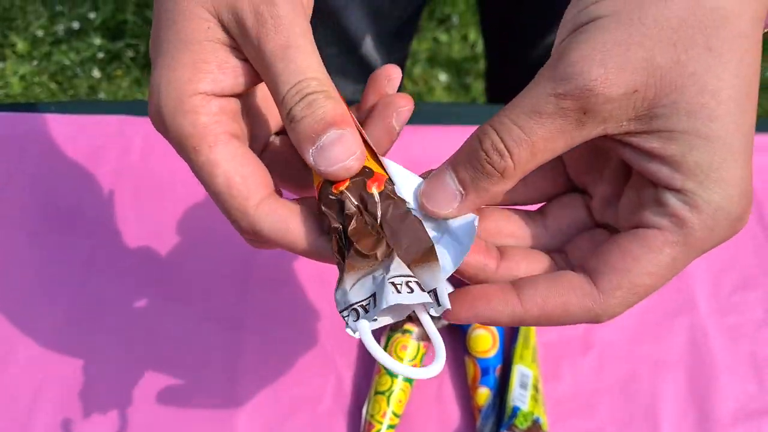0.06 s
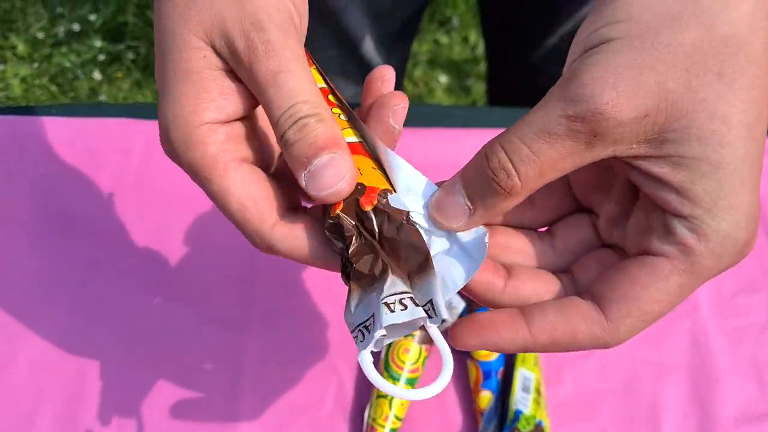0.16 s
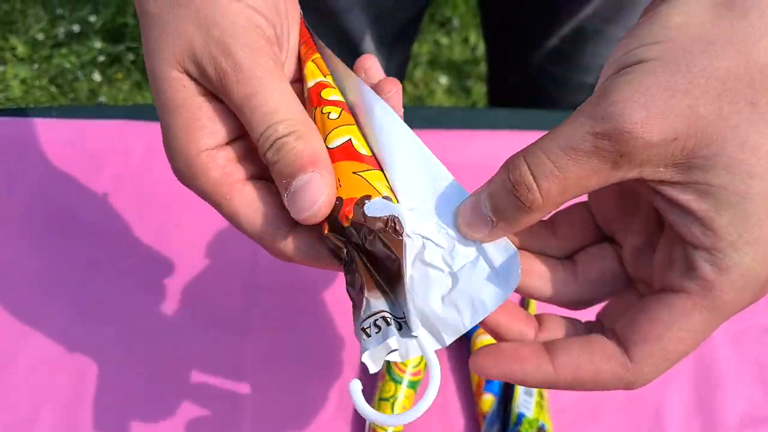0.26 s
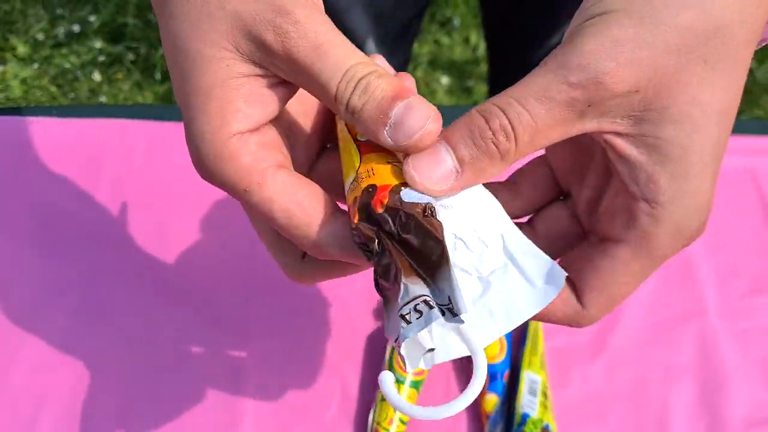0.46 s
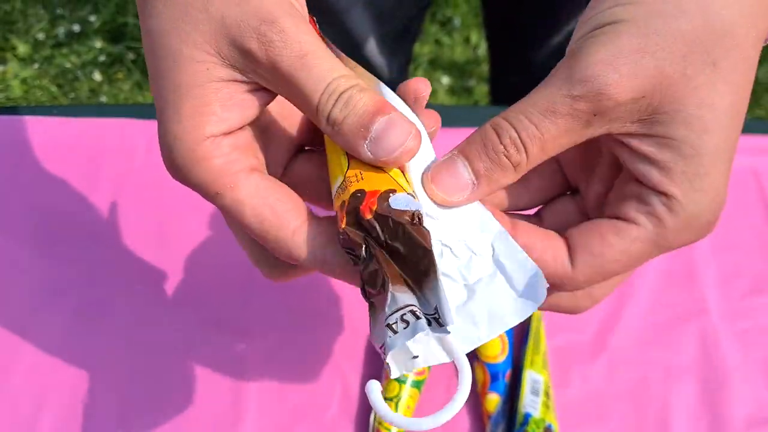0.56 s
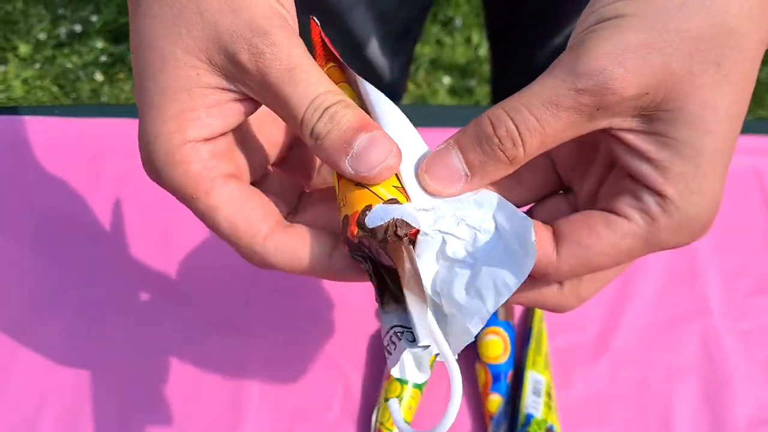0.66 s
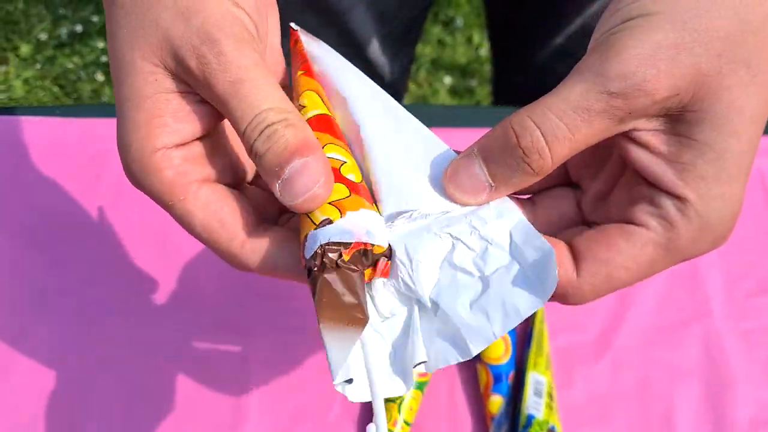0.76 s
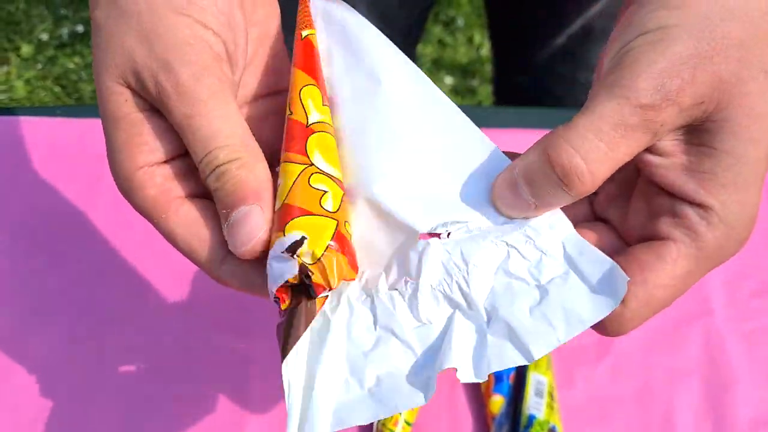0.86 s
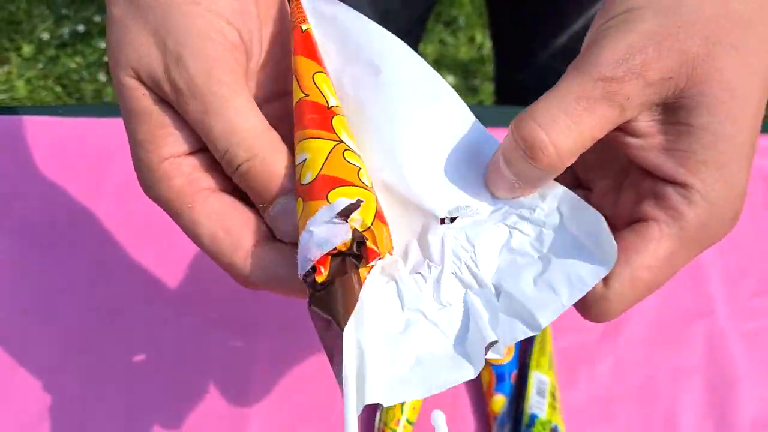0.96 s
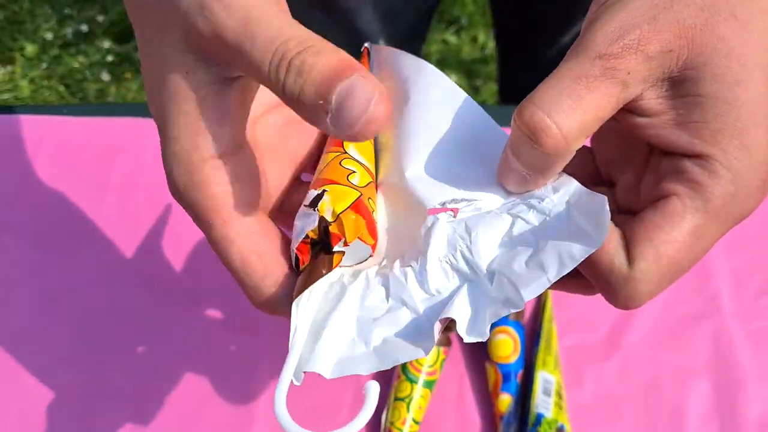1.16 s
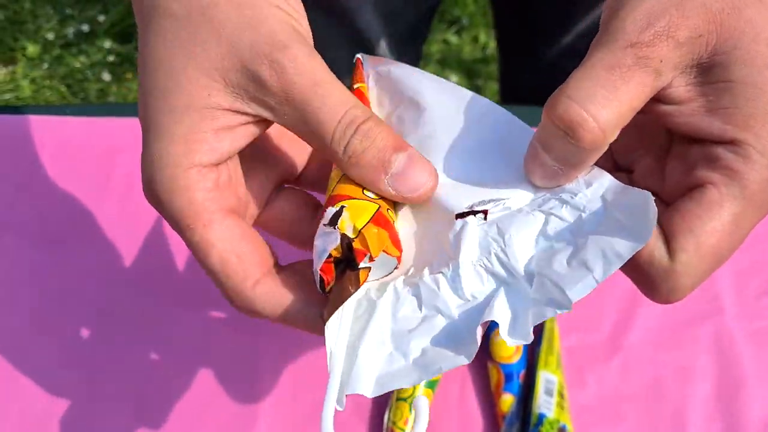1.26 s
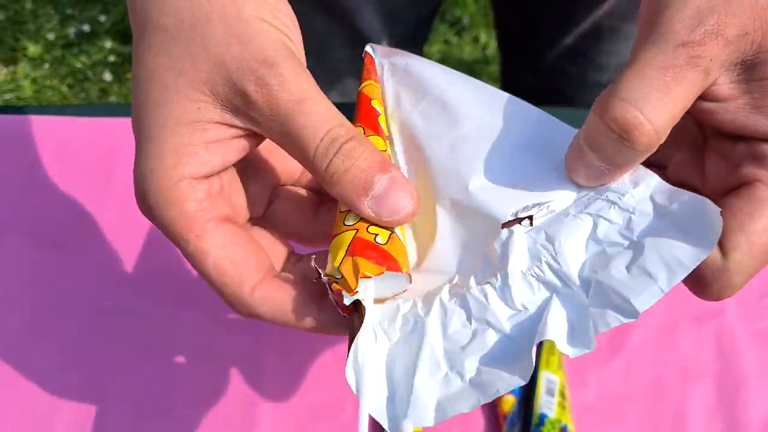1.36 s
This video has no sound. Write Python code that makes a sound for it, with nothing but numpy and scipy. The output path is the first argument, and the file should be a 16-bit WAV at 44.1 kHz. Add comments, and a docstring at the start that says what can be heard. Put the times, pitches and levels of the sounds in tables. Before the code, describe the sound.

Hands peel a paper and foil sweet wrapper: scattered sharp snaps, a short rip, then a louder tearing burst and dying dry rustle; faint birds and light breeze, outdoors, close stereo phone microphone.

```python
"""Sharp paper snaps, two swells of ripping and a dry rustle, with faint bird whistles and a low breeze behind.
Hands peel a paper and foil wrapper off a sweet, close to a phone held outdoors.
Snaps are short bursts of noise and the rip is a dense rain of tiny cracks; both ring the same paper resonances.
Birds are wavering sine tones with echoes, the breeze is filtered noise, and air puffs are brief low swings."""
import sys
import numpy as np
from scipy import signal
from scipy.fft import rfft, irfft
from scipy.io import wavfile
from scipy.ndimage import uniform_filter1d

SR = 44100
rng = np.random.default_rng(int(sys.argv[2]) if len(sys.argv) > 2 else 0)


def master(y):
    """Save y as 16-bit WAV."""
    cut = np.clip(np.atleast_2d(y).T, -1, 1)
    pcm = np.round(cut * 32767)  # scale
    wavfile.write(sys.argv[1], SR, pcm.astype(np.int16))


N = 61739

# Breeze on the microphones. Each row: time in seconds, level in dB.
WIND = [(0.0, -42), (0.076, -50.5), (0.224, -52.5), (0.334, -63), (0.49, -39), (0.528, -56), (0.7, -48),
        (0.72, -46), (0.848, -55), (0.906, -48.5), (0.992, -59), (1.104, -46.5), (1.176, -62), (1.222, -53),
        (1.256, -39), (1.4, -45.5)]
# Tone of the breeze. Each row: frequency in Hz, relative strength in dB per Hz.
WIND_TONE = [(12, -47), (20, -3), (70, 17), (88, 3), (118, -2), (172, -19), (271, -16), (300, -9),
             (390, -24), (660, -120)]
# Tone of the garden hush. Each row: frequency in Hz, relative strength in dB per Hz.
HUSH_TONE = [(88, -42), (150, -22), (923, -33), (3100, -28), (3490, -22), (5150, -35.5), (6390, -33),
             (14500, -53), (16000, -61)]
# Puffs of air. Each row: start in seconds, level in dB, pitch in Hz, left level minus right level in dB.
BUFFETS = [(0, -31, 70, 21), (0.718, -30.5, 59.6, -9), (1.258, -31, 77, -17)]
# Bird calls, one list per call. Each row: time in seconds, pitch in Hz, level in dB.
BIRDS = [
    [(.544, 4300, -48), (.553, 4900, -44), (.565, 4650, -46), (.578, 3600, -48)],
    [(.583, 3500, -46), (.591, 4350, -47), (.603, 3550, -48)],
    [(.606, 3150, -50), (.621, 2700, -53)],
    [(.965, 3130, -61), (.99, 3300, -59), (1.025, 3350, -62)],
    [(1.065, 3550, -60), (1.1, 3730, -58), (1.12, 3700, -60)],
    [(1.295, 3700, -55), (1.345, 3650, -53), (1.37, 3600, -57)],
]
# Resonances of the wrapper. Each row: pitch in Hz, width in Hz, level in dB.
SHEET = [(359, 590, -9), (613, 209, 7), (1100, 130, 10), (1440, 216, 13), (1836, 332, 11),
         (2277, 270, 10.5), (3058, 885, 11.5), (4000, 620, 11.5), (4650, 670, 4), (5700, 1730, -1),
         (7480, 1150, -1.5), (9870, 2230, -10.5), (12600, 2230, -5.5), (14340, 7200, -14)]
# The lowest resonance grows as the flap unfolds. Each row: time in seconds, added level in dB.
FLAP = [(.6, -16), (.9, 16.5)]
# Ripping and rustling. Each row: time in seconds, level in dB, then bass, low middle and treble in dB
# against the middle.
RIP = [(0, -78.5, 0, -2, 21.5), (.09, -52.5, -26, -4, 5), (.15, -40.5, -16, -10.5, -2),
       (.19, -26.5, -16, -8, -1.5), (.245, -26, -14.5, -1.5, -8), (.27, -49, -12, -5.5, -5.5),
       (.31, -55, -3, -2.5, -5), (.345, -44.5, -11, 0.5, -3), (.38, -57, -6, -14, -4),
       (.41, -80, -6, -3, -28), (.46, -60, -4, 1, 4), (.51, -35.5, -20.5, -6.5, -19),
       (.57, -44, -13, 4, -10.5), (.585, -50.5, -10, -13, -64), (.635, -43.5, -23, -20, -3),
       (.645, -30.5, -18, -5, -3), (.668, -36, -7.5, -5.5, 0), (.682, -21, -15, -11.5, -7),
       (.73, -22.5, -10.5, -1.5, -2), (.765, -18, -3.5, -2, -4.5), (.787, -19.5, -8.5, -15, -8.5),
       (.795, -45, -11, -27, -8.5), (.83, -29.5, -6.5, 1, 3), (.845, -48, -4, -3, -4.5),
       (.93, -42, -10, -2, -6.5), (.96, -49.5, -3, -1, 1.5), (1.02, -56, -4.5, -7.5, -4.5),
       (1.07, -43.5, -5, -2, 3.5), (1.1, -55, -12, -11, 1), (1.14, -56, -4.5, -6.5, -0.5),
       (1.25, -65, -3, 11.5, 13.5), (1.3, -52, -9, -10.5, 2.5), (1.37, -48.5, -16, -12, -8.5),
       (1.4, -37, -7.5, -2, -8)]
# Snapping creases. Each row: start in seconds, level in dB, favoured pitch in Hz, then bass, low middle,
# middle and treble in dB added to that level, and time for the crack to build up in milliseconds.
SNAPS = [(0.039, -32, 7950, -34, -29, -21.5, -10.5, 0.75), (0.0828, -17, 4300, -40, -38, -6.5, -15, 0.585),
         (0.195, -24.5, 3180, -24, -5.5, -28, -4.5, 0.96), (0.227, -22.5, 645, -3, -32, -14, -24, 0.17),
         (0.3242, -9.5, 3850, -29, -13.5, -11.5, -14, 0.93), (0.346, -33, 1490, -21, -8, -20, -26, 0.89),
         (0.386, -28.5, 4000, -33, -29, -12, -15, 0.81), (0.433, -41, 1330, -20, -13, -9, -14, 1),
         (0.462, -29.5, 1740, -25, -14, -11.5, -9.5, 0.45), (0.505, -34, 1100, -32, -2.5, -7, -12.5, 0.32),
         (0.5291, -4, 3800, -31.5, -17, -10.5, -16, 0.591), (0.543, -35, 1500, -17, -27, -15, -29, 0.58),
         (0.553, -42, 1410, -28, 0, -11, -13, 0.92), (0.5655, -26.5, 540, -12, -8.5, -5, -36, 0.93),
         (0.6405, -35, 2060, -27, 7, 11, -5, 0.83), (0.644, -15.5, 2840, -22.5, -28.5, -12, -16, 0.72),
         (0.6539, -38.5, 3940, -31, -18, 6.5, 13, 0.67), (0.755, -6, 600, -15, -12, -9.5, -15, 0.77),
         (0.768, -13.5, 706, -29, -7.5, -9, -8, 0.92), (0.781, -4.5, 2880, -41, -13.5, -7.5, -17, 0.79),
         (0.795, -13, 1100, -12.5, -9, -12.5, -22, 1), (0.812, -14.5, 1110, -13, -14, -18, -15, 0.76),
         (0.822, -12, 470, -16.5, -14, -16, -13, 0.88), (0.828, -22, 1100, -13.5, -24, -1, -15, 1),
         (0.845, -22, 1210, -15.5, -4, -16, -31, 0.66), (0.878, -24.5, 1230, -25, -11.5, -11, -24.5, 0.9),
         (0.888, -34, 1450, -13, -9, -9, -6, 0.85), (0.908, -26, 4500, -17, -32, -9.5, -17, 0.8),
         (0.922, -24, 3870, -17.5, -14.5, -11, -9.5, 0.87),
         (0.932, -18, 377, -13.5, -16, -11, -12.5, 0.828), (0.976, -34.5, 520, -8, -14, -19, -14.5, 1),
         (1.029, -43, 513, 0.5, -8, -10, -26, 1), (1.2303, -45, 7200, -18, -28, -11, -8, 1),
         (1.2092, -25, 2230, -20, -23, -9.5, -12, 0.98), (1.2386, -30.5, 1100, -30, -9, -7, -26, 0.85),
         (1.254, -23, 553, -8, -16.5, -13.5, -14, 0.74), (1.296, -35.5, 1420, -13, -6.5, -7.5, -25, 0.89),
         (1.315, -26, 4250, -19, -21, -9, -20, 0.9), (1.379, -18, 1600, -20.5, -12.5, -16, -24, 0.91),
         (1.3874, -16, 3820, -27, -23, -10.5, -8, 0.74)]

WIND_SIDE_DB = -1.5  # the part of the breeze that is opposite on the two sides
HUSH_DB, HUSH_FLICKER_DB = -56.5, 0.5
BUFFET_S = 0.0062  # time for a puff to reach its full swing
BIRD_ROUGH, BIRD_WOBBLE = .5, .018  # wander of loudness and of pitch, as shares
BIRD_EDGE_S, BIRD_ECHO_DB, BIRD_ECHO_S = 0.00069, 1, .03
SPLITS_HZ = (900, 2000, 5200)  # borders between bass, low middle, middle and treble
LAG_S, SNAP_LAG_S, LAG_SPREAD_S = .0001, .00007, .00002  # the left port hears the sheet first
RIGHT_DB = 2.5  # the low middle is stronger on the right
APART_HZ = 3260  # sets how fast the two ports drift out of step as pitch rises
SCATTER_DB, SCATTER_PITCH = 0.6, 0.019  # how much resonances differ from spot to spot: level, share of pitch
CRACKS_PER_S, CRACK_SPREAD_DB, RIP_FLUTTER_DB = 13000, 1.8, 1.4
RIP_FLAP_DB = -9.0  # added to the lowest resonance in the rip
SHIVER_DB, SHIVER_S = -13, .005  # the sheet shivers on after each snap
BREAK_DB, BREAK_S = 17, .000033  # the single sharp break at the height of a crack
PITCH_DB, PITCH_SHARE = 5, .2  # the favoured ring: strength of the added peak, width / pitch
SNAP_SPAN_S = .006  # band levels are means over this span
SNAP_DAMP = 1.5  # fingers on the crease widen the resonances
TOP_HZ = 15800  # top of the recorded range


def undb(db):
    """Turn dB into a plain multiplier."""
    return 10 ** (np.asarray(db) / 20)


def unit(x):
    """Scale a signal to an average (rms) strength of 1."""
    return x / np.sqrt(np.mean(x ** 2))


def curve(rows, col):
    """One column of a table as a value per sample, joined by straight lines."""
    rows = np.array(rows)
    return np.interp(np.arange(N) / SR, rows[:, 0], rows[:, col])


def walk(rate):
    """Smooth random wander, spread 1, with about `rate` new values a second."""
    k = int(SR / rate)
    steps = np.repeat(rng.standard_normal(N // k + 1), k)
    return unit(uniform_filter1d(steps, k)[:N])


def coloured(shape):
    """Noise of rms 1 whose spectrum follows a table of (Hz, dB) points."""
    f = np.arange(N // 2 + 1) * SR / N + 1  # the 1 keeps the logarithm finite
    shape = np.array(shape)
    gain = undb(np.interp(np.log(f), np.log(shape[:, 0]), shape[:, 1], left=-80))
    return unit(irfft(rfft(rng.standard_normal(N)) * gain, N))


def outdoors():
    """Gusty rumble, largely different on each port, over a faint, slightly flickering hush."""
    mid = coloured(WIND_TONE)
    side = coloured(WIND_TONE) * undb(WIND_SIDE_DB)
    wind = undb(curve(WIND, 1)) * np.array([mid + side, mid - side])
    hush = np.array([coloured(HUSH_TONE), coloured(HUSH_TONE)])
    return wind + undb(HUSH_DB + HUSH_FLICKER_DB * walk(15.0)) * hush


def buffets():
    """A puff of air rocks the microphone membranes for a cycle or two: a sine that swells and dies away."""
    out, t = np.zeros((2, N)), np.arange(N) / SR
    for at, db, hz, pan_db in BUFFETS:
        age = np.maximum(t - at, 0)
        swell = age / BUFFET_S * np.exp(1 - age / BUFFET_S)
        swing = swell * np.sin(2 * np.pi * hz * age)
        out += swing * undb(db + np.array([[pan_db], [-pan_db]]) / 2)
    return out


def birds():
    """Wavering whistles from a tree nearby, blurred by echoes off leaves and walls."""
    out, t = np.zeros(N), np.arange(N) / SR
    wobble = 1 + BIRD_WOBBLE * walk(250)
    for call in BIRDS:
        start, end = call[0][0], call[-1][0]
        edge = np.clip(np.minimum(t - start, end - t) / BIRD_EDGE_S, 0, 1)
        phase = 2 * np.pi * np.cumsum(curve(call, 1) * wobble) / SR
        out += edge * undb(curve(call, 2)) * np.sqrt(2) * np.sin(phase)
    out *= 1 + BIRD_ROUGH * walk(300)
    # fading noise, different on each side, acts as a thick cloud of echoes
    fade = np.exp(-t[:6000] / BIRD_ECHO_S) * np.sqrt(2 / BIRD_ECHO_S / SR)
    echoes = rng.standard_normal((2, 6000)) * fade
    return out + undb(BIRD_ECHO_DB) * signal.fftconvolve(out[None], echoes)[:, :N]


def peak(f, hz, width):
    """Response of one resonance, 1 at its centre."""
    return 1j * f * width / (hz ** 2 - f ** 2 + 1j * f * width)


def sheet(f, chance, flap_db, lag_s, damp=1, flip=-1):
    """Sum the resonances of one spot on the wrapper, by band from bass to treble, port and frequency."""
    out = np.zeros((4, 2, len(f)), complex)
    # chance holds 14 random values each for level, pitch and turn, then one for the lag
    lag = lag_s + LAG_SPREAD_S * chance[-1]
    for k, (hz, width, db) in enumerate(SHEET):
        level_db = db + SCATTER_DB * chance[k] + flap_db * (k == 0)
        pitch = hz * (1 + SCATTER_PITCH * chance[14 + k])
        # flip = -1 turns every second resonance upside down
        ring = flip ** k * undb(level_db) * peak(f, pitch, damp * width) ** 2
        turn = chance[28 + k] * min(hz / APART_HZ, 1.5) / damp
        right = undb(RIGHT_DB * (SPLITS_HZ[0] < hz < SPLITS_HZ[1]))
        ports = np.array([1 + 0 * f, right * np.exp(1j * turn - 2j * np.pi * f * lag)])
        out[np.searchsorted(SPLITS_HZ, hz)] += ring * ports
    return out


def rip(count=6):
    """Tiny cracks of uneven size, from several spots on the sheet, swell with the pull."""
    f, bands = np.arange(N // 2 + 1) * SR / N, 0
    for _ in range(count):
        hit = rng.random(N) < CRACKS_PER_S / count / SR
        size = undb(CRACK_SPREAD_DB * rng.exponential(size=N))
        cracks = hit * size * rng.standard_normal(N) * undb(RIP_FLUTTER_DB * walk(140))
        spot = sheet(f, rng.standard_normal(43), RIP_FLAP_DB, LAG_S)
        bands = bands + irfft(rfft(cracks) * spot, N)
    bass, low, mid, high = (unit(b) for b in bands)
    tone = undb(curve(RIP, 2)) * bass + undb(curve(RIP, 3)) * low + mid + undb(curve(RIP, 4)) * high
    return undb(curve(RIP, 1)) * tone


def snaps():
    """A crease cracks up to a sharp break within about a millisecond and rings the sheet."""
    size = 2048  # samples in one snap
    out, t = np.zeros((2, N + size)), np.arange(size) / SR
    f = np.arange(size // 2 + 1) * SR / size
    for at, db, hz, *bands_db, ms in SNAPS:
        chance, crack = rng.standard_normal(43), rng.standard_normal(size)
        rise = max(ms, .2) / 1000
        crack *= t / rise * np.exp(1 - t / rise) + undb(SHIVER_DB) * np.exp(-t / SHIVER_S)
        crack += undb(BREAK_DB) * np.exp(-((t - rise) / BREAK_S) ** 2)
        flap_db = np.interp(at, *np.array(FLAP).T)
        body = sheet(f, chance, flap_db, SNAP_LAG_S, SNAP_DAMP, flip=0.96)
        body = body * (1 + undb(PITCH_DB) * peak(f, hz, hz * PITCH_SHARE))
        x = irfft(rfft(crack) * body, size)
        # bring every band to the same strength, averaged over both ports
        energy = (x ** 2).sum(2, keepdims=True).mean(1, keepdims=True)
        x /= np.sqrt(energy / (SNAP_SPAN_S * SR))
        i = int(at * SR)
        out[:, i:i + size] += np.tensordot(undb(db + np.array(bands_db)), x, 1)
    return out[:, :N]


def scene():
    """Add the background, the birds and the wrapper together."""
    return outdoors() + buffets() + birds() + rip() + snaps()


def record(dry):
    """The phone rounds the loudest peaks and cuts the top."""
    rounded = np.tanh(dry)
    cut = signal.ellip(10, .2, 95, TOP_HZ, fs=SR, output="sos")
    return signal.sosfilt(cut, rounded)


dry = scene()
out = record(dry)
master(out)
```